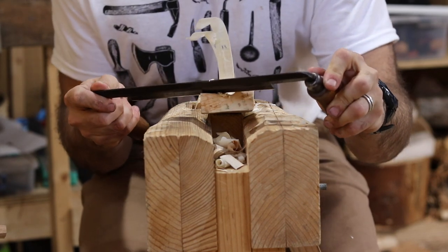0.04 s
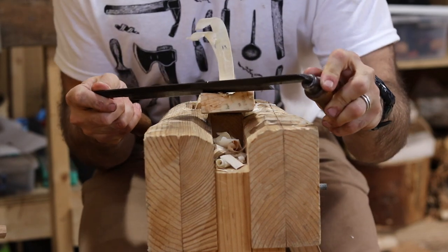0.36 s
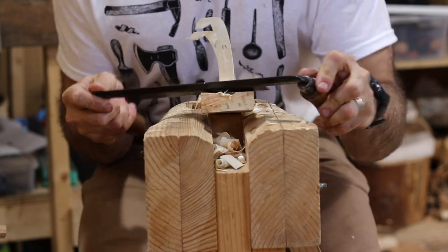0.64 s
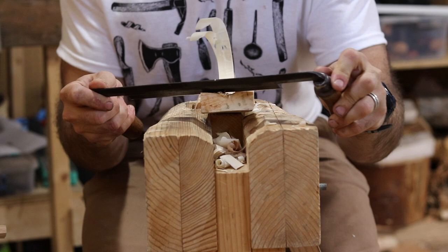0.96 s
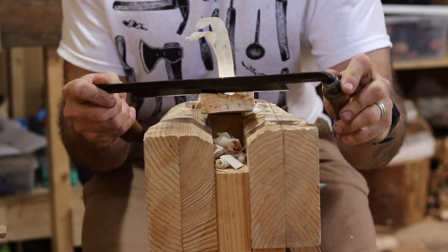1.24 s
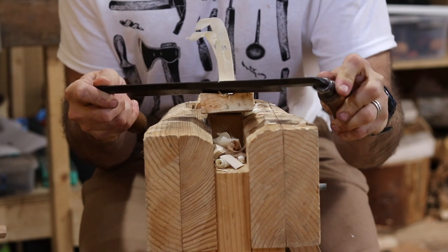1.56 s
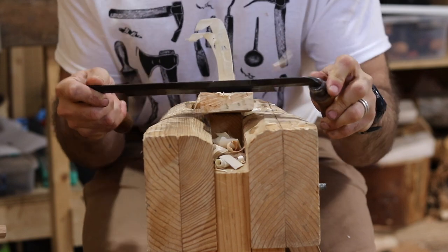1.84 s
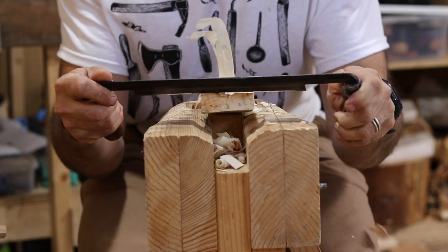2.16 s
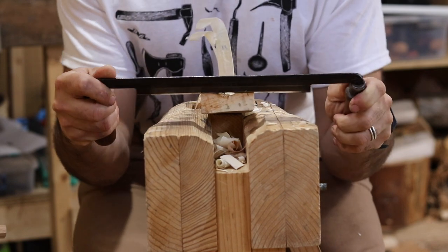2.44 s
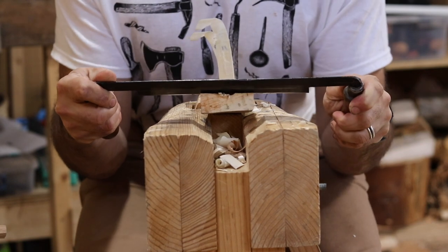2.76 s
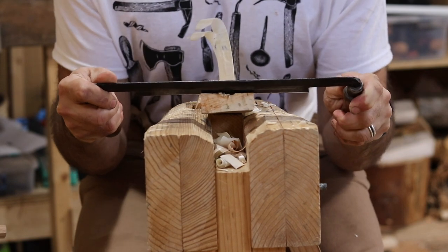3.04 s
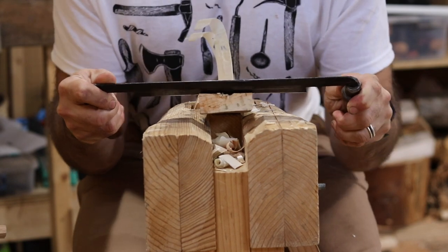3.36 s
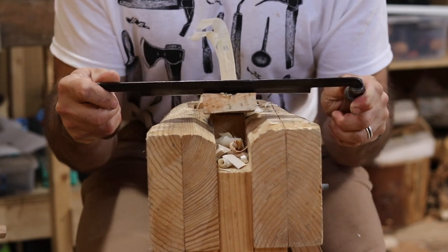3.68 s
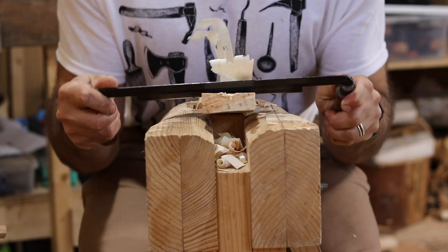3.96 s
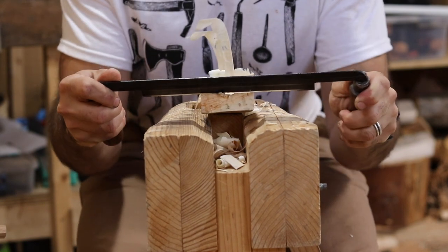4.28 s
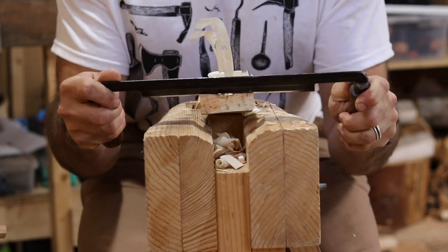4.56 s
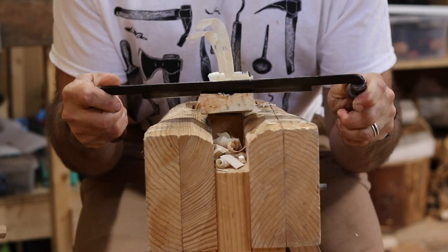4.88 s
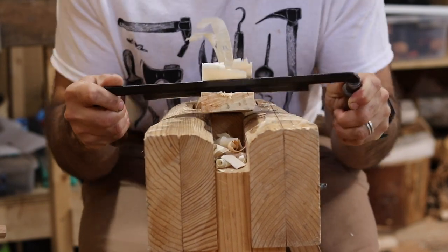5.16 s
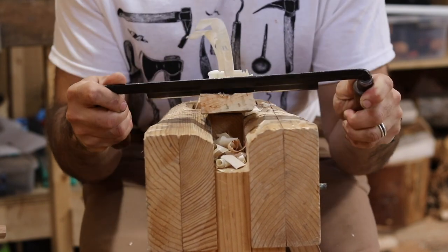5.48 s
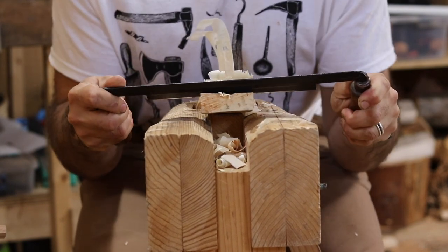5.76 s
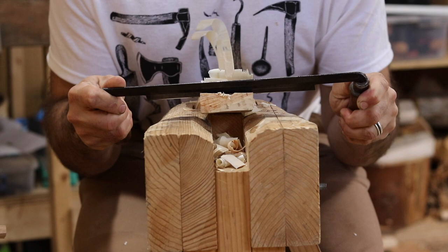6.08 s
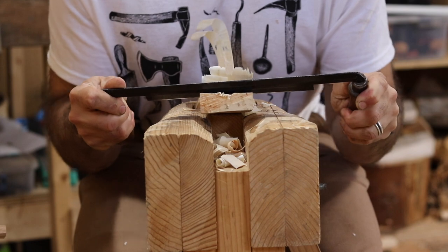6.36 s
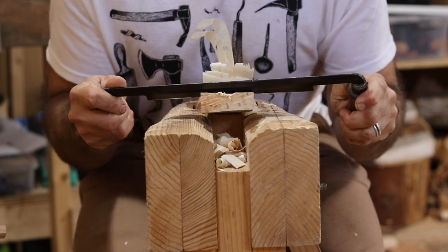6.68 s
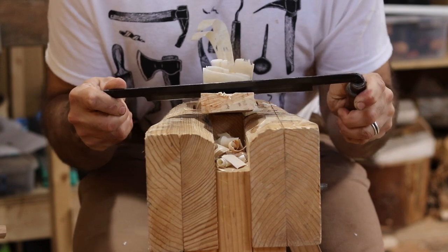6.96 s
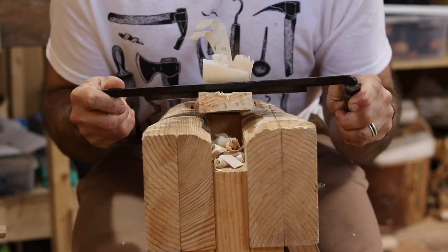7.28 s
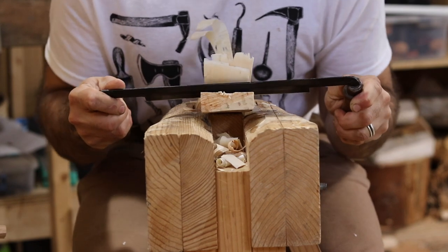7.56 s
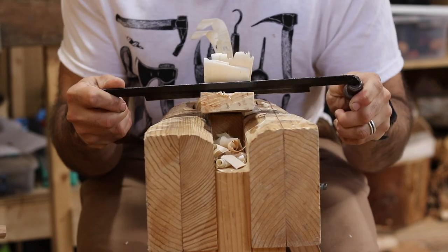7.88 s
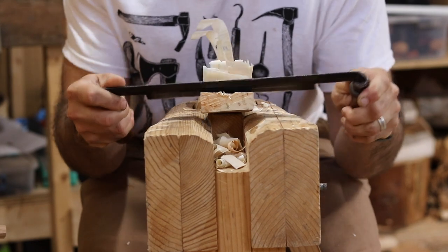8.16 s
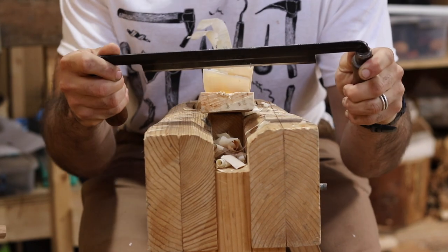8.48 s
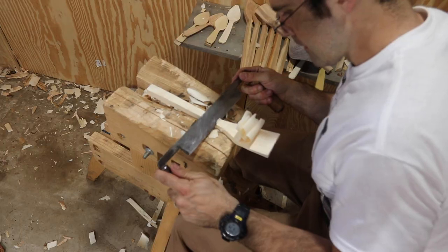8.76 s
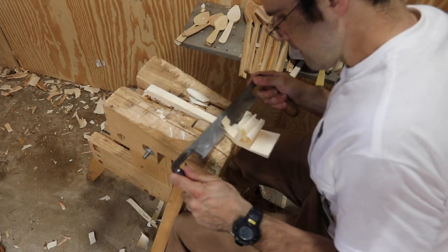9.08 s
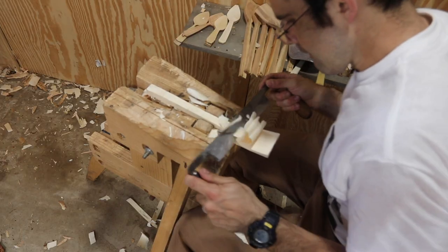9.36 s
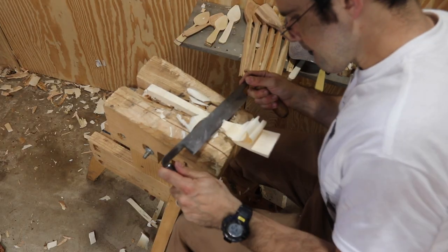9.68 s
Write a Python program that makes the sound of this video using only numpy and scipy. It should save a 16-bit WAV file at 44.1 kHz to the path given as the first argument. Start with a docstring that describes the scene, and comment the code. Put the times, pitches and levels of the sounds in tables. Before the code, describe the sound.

Crackling scrapes of a steel blade shaving wood, broken by sharp snaps, blunt knocks and occasional thuds over a low room rumble.

```python
"""A small, quiet workshop: a drawknife is pulled through a billet clamped in a wooden shaving horse.
The edge tears fibres in a dense crackle and rings the steel blade; the shaving splits ahead of it in
sharp cracks. The billet knocks in its clamp, the horse thuds as the blade breaks through, and a few
faint squeaks pass. Tearing, cracks and knocks ring the wood and the room, over a low, steady rumble."""
import sys
import numpy as np
from scipy import signal
from scipy.fft import rfft, irfft, next_fast_len
from scipy.io import wavfile

SR = 44100
rng = np.random.default_rng(int(sys.argv[2]) if len(sys.argv) > 2 else 0)


def waveform_to_disk(signal):
    """Save audio, clipped to [-1, 1], as 16-bit WAV at the path in sys.argv[1]."""
    frames = np.transpose(np.atleast_2d(signal))
    scaled = np.clip(frames, -1, 1) * 32767
    samples = np.round(scaled).astype(np.int16)
    wavfile.write(sys.argv[1], SR, samples)


N = 429093
TIME = np.arange(N) / SR
BRIGHT_FROM_S = 8.7  # pulls and cracks turn brighter, with less shudder


def undb(db):
    """Decibels to gain."""
    return 10 ** (np.asarray(db) / 20)


def unit(x):
    """Scale to a mean energy of one per channel."""
    return x / np.sqrt(np.mean(np.sum(x ** 2, axis=-1)) + 1e-18)


def along(points, hz):
    """Interpolate (freq_hz, value) points on a log-frequency axis."""
    freq_hz, value = np.transpose(points)
    return np.interp(np.log(hz + 1), np.log(freq_hz), value)


def ring(x, response):
    """Convolve with an impulse response, tail included."""
    return signal.fftconvolve(np.atleast_2d(x), np.atleast_2d(response), axes=-1)


def fade(t, t60_s):
    """Exponential decay, 60 dB in t60_s."""
    return np.exp(-np.log(1000) * t / t60_s)


def wobble(size, rate_hz):
    """Random curve through rate_hz Gaussian points a second."""
    return np.interp(TIME[:size] * rate_hz, np.arange(size), rng.standard_normal(size))


def pan(db):
    """Left, right and room gains; db is left minus right."""
    return undb(np.array([[db], [-db], [0]]) / 2)


def add(out, start_s, sound):
    """Mix a sound in at start_s."""
    i = int(start_s * SR)
    out[:, i:i + sound.shape[1]] += sound[:, :N - i]


def diffuse(size, colour=None, spacing_s=0.00025):
    """Stereo noise from all sides: alike in the bass, unrelated in the treble."""
    padded = next_fast_len(size, True)
    hz = np.fft.rfftfreq(padded, 1 / SR)
    coherence = np.clip(0.98 * np.sinc(2 * hz * spacing_s), -1, 1)
    mid, side = rfft(rng.standard_normal((2, padded))) * np.sqrt([1 + coherence, 1 - coherence])
    gain = 1 if colour is None else undb(along(colour, hz))
    return irfft(gain * np.array([mid + side, mid - side]), padded)[:, :size] / np.sqrt(2)


def path_noise(size, shared=0.48):
    """Left, right and room noise; left and right share a direct part."""
    direct, room = rng.standard_normal((2, size))
    return np.vstack([np.sqrt(1 - shared) * diffuse(size) + np.sqrt(shared) * direct, room])


# Still air: freq_hz, level_db
AIR_SPECTRUM = [(15, -34), (25, -20.5), (59, -8.5), (111, -15.5), (145, -11), (170, -19.5), (212, -25),
                (270, -21), (734, -25.5), (4490, -36.5), (5570, -43), (6050, -34), (9840, -38.5),
                (16000, -47.5)]


def air(level_db=-47.5):
    """Steady low rumble and faint hiss of the room."""
    return unit(diffuse(N, AIR_SPECTRUM)) * np.sqrt(N) * undb(level_db) * pan(-1.6)[:2]


# Reverberation: freq_hz, level_db, t60_s
ROOM_BANDS = [(100, 5, 0.99), (410, 5, 0.33), (1070, 8.5, 0.29), (3170, 1, 0.45), (7400, 6.5, 0.26),
              (14000, -4.5, 0.54)]


def workshop(paths, gain_db=-3.5, build_s=0.0011, size=32768):
    """Direct sound plus reflections from floor, shelves and walls; the bass lasts longest."""
    t, tail = TIME[:size], 0
    centres_hz, levels_db, t60s_s = np.transpose(ROOM_BANDS)
    noise, bins_hz = rfft(diffuse(size)), np.fft.rfftfreq(size, 1 / SR)
    for weights, db, t60_s in zip(np.eye(len(centres_hz)), levels_db, t60s_s):
        band = irfft(noise * along(np.transpose([centres_hz, weights]), bins_hz))
        envelope = unit(fade(t, t60_s) * (1 - np.exp(-t / build_s)))
        tail = tail + undb(db + gain_db) * band * envelope
    return paths[:2] + pan(-1.6)[:2] * ring(paths[2], tail)[:, :N]


# Squeaks: start_s, length_s, pitch_hz, level_db
SQUEAKS = [(0.323, 0.12, 3180, -48), (1.534, 0.081, 5520, -55), (5.644, 0.084, 3330, -42.5),
           (8.265, 0.13, 10900, -54), (8.57, 0.22, 5140, -63)]


def squeaks(sag_per_s=1.0, waver=0.022, waver_hz=600, flutter_db=4, size=8192):
    """Thin, rough squeaks that flutter and sag in pitch."""
    out, t = np.zeros((3, N)), TIME[:size]
    for start_s, length_s, pitch_hz, level_db in SQUEAKS:
        bend = 1 - sag_per_s * (t - length_s / 2) + waver * wobble(size, waver_hz)
        phase = 2 * np.pi * np.cumsum(pitch_hz * bend) / SR
        gain = undb(level_db + flutter_db * wobble(size, waver_hz))
        swell = np.interp(t, [0, 0.005, length_s / 2, length_s], [0.55, 0.74, 0.52, 0.085])
        add(out, start_s, gain * swell * np.sin(phase) * pan(-2))
    return out


# Frame thuds: start_s, level_db, t60_s
LURCHES = [(0.743, -36, 0.36), (1.79, -43, 0.34), (3.942, -36, 0.37), (5.017, -20.5, 0.25),
           (5.065, -22, 0.26), (5.76, -33.5, 0.36), (9.255, -28, 0.22)]


def lurches(rise_s=0.0022, size=12288):
    """The blade breaks through; the heavy frame rocks and thuds on the floor."""
    out, t = np.zeros((3, N)), TIME[:size]
    for start_s, level_db, t60_s in LURCHES:
        thud = diffuse(size, [(20, -28), (45, -3), (70, -9), (100, -1), (200, -4), (270, -11),
                              (400, -1.5), (600, -28), (2000, -60)])
        envelope = fade(t, t60_s) * (1 - np.exp(-t / rise_s))
        add(out[:2], start_s, undb(level_db) * thud / thud.std() * envelope)
    return out


# Cut wood, two colours: freq_hz, level_db
DARK_WOOD = [(88, -51), (150, -5.5), (254, -15.5), (391, 4), (457, -1.5), (624, 2), (759, -6.5),
             (923, -5.5), (1290, -8), (1530, -9.5), (2270, -13), (3840, -15.5), (4860, -20.5), (9260, -18),
             (16000, -32)]
BRIGHT_WOOD = [(59, -35), (100, -21), (210, -7), (492, -7.5), (662, 0), (736, -9), (872, 7.5), (1520, -5),
               (3860, -7.5), (4870, -11.5), (8460, -6), (11900, -12), (16000, -20.5)]
# Resonances of billet and horse: freq_hz, level_db
HORSE_MODES = [(376.8, -41), (802.1, -36), (936.7, -57), (1572, -92), (1997, -42), (2439, -34.5)]
# Bounds of the body, rasp, bite and hiss bands: edge_hz
BAND_EDGES_HZ = [60, 800, 2000, 4500, 18000]


def wood(colour, ring_db, quality=28, size=4096):
    """Wood's response, a short snap plus the ringing horse, in four bands of unit energy."""
    t = TIME[:size]
    cepstrum = irfft(np.log(undb(along(colour, np.fft.rfftfreq(size, 1 / SR)))))
    cepstrum[1:size // 2] *= 2  # fold to minimum phase
    cepstrum[size // 2:] = 0
    snap = irfft(np.exp(rfft(cepstrum)))
    modes = sum(undb(db) * np.sqrt(hz) * np.exp(-np.pi * hz / quality * t) * np.cos(2 * np.pi * hz * t)
                for hz, db in HORSE_MODES)
    response = unit(snap) + undb(ring_db) * unit(modes)
    filters = [signal.butter(3, band_hz, "band", fs=SR, output="sos")
               for band_hz in zip(BAND_EDGES_HZ, BAND_EDGES_HZ[1:])]
    return np.array([unit(signal.sosfilt(sos, response)) for sos in filters])


# Blade and billet against the horse: start_s, level_db, hardness_db, pitch_hz, note_db
KNOCKS = [(0.127, -19.5, -7, 518, 5.5), (0.171, -27, -9, 490, -9), (0.483, -23, -1.5, 864, -29),
          (0.639, -19, 1.5, 351, -2.5), (0.963, -34, 9, 644, 6), (1.117, -36, 1, 665, 12),
          (1.227, -35, 13.5, 535, 4.5), (1.256, -28.5, -10, 927, 0), (1.569, -18, -0.5, 537, -1),
          (1.972, -30.5, 11, 538, 1), (2.097, -29.5, 9, 697, 1.5), (2.144, -28, -4.5, 690, -4),
          (3.538, -34.5, -1.5, 508, -0.5), (4.166, -38.5, 8.5, 930, -11), (6.237, -30, 4, 686, -18),
          (8.167, -34, 0, 492, 6), (8.202, -41, -19, 426, 17.5)]


def knocks(gain_db=16, rattle_t60_s=0.13, note_t60_s=0.06, size=4096):
    """Blunt contacts rattle in the clamp, brighter when harder; each sends one note into the room."""
    out, t, bands = np.zeros((3, N)), TIME[:size], wood(DARK_WOOD, ring_db=-12.5)
    for start_s, level_db, hardness_db, pitch_hz, note_db in KNOCKS:
        gain = undb(level_db + gain_db)
        rattle = unit(diffuse(size) * fade(t, rattle_t60_s))
        contact = np.vstack([rattle, undb(-2) * (t == 0)])
        response = undb([0, hardness_db / 2 + 2, hardness_db - 3, hardness_db / 2 - 12]) @ bands
        add(out, start_s, gain * ring(contact, response) * pan(-0.7))
        note = unit(np.sin(2 * np.pi * pitch_hz * t) * fade(t, note_t60_s))
        add(out, start_s, gain * undb(note_db + 2) * note * undb([[0], [0], [-5]]))
    return out


def fibres(size, per_s, spread_db, snap_s):
    """Envelope of fibres snapping at random: many small, a few large."""
    hits = rng.random(size) < per_s / SR
    snaps = hits * undb(spread_db * np.minimum(rng.exponential(size=size), 4))
    power = signal.lfilter([1], [1, -np.exp(-1 / (snap_s * SR))], snaps ** 2) + 1e-12
    return np.sqrt(power / power.mean())


def chip(hz, quality, size=4096):
    """One damped bending note of a sliver of wood."""
    t = TIME[:size]
    return unit(np.exp(-np.pi * hz / quality * t) * np.sin(2 * np.pi * hz * t))


# Splits of the shaving: snap_s, level_db, body_db, hiss_db, pan_db, pitch_hz
CRACKS = [(0.389, -19.5, -5, -8, -1, 3500), (0.5861, -18.5, -6, -3, -6.5, 3500),
          (0.7236, -20, 2.5, 2, -4, 3750), (1.1129, -21.5, -1, -11.5, -4, 1060),
          (1.2048, -24.5, -26, 8.5, -2, 3000), (1.5337, -14, -13, -8.5, -1, 5620),
          (1.7505, -34, 10, 15.5, -3, 1450), (1.7755, -25.5, 4, -7, 2, 8250),
          (1.853, -23, -4, -3, -7, 7800), (2.395, -35, -14, -5, -7, 3070),
          (2.7267, -21, -8, -14, -10, 2580), (2.7904, -12.5, -44, -8, -3, 1370),
          (2.8868, -25, 1, 2, -2, 2890), (2.9368, -19.5, -0.5, -3.5, -6, 1740),
          (3.0028, -35, 2, 8.5, -3.5, 1520), (3.0224, -26, -2, 1, -4, 6240),
          (3.1143, -20.5, 5, 2, -2, 2790), (3.3096, -12, -15, -3, -2, 1900),
          (3.5991, -13.5, -7.5, -9, 0, 1700), (3.775, -27.5, 1, -1.5, 0, 2450),
          (3.9764, -21, -28, -8, -5, 1410), (4.4652, -25, 1, 4, 0, 7000),
          (4.7301, -15.5, -3.5, -7.5, -3, 1800), (4.832, -29, 5, -5, -8, 1560),
          (5.0383, -7.5, -19, -8, -3, 2040), (5.0669, -19.5, 10, 2.5, -9, 1960),
          (5.1684, -34, -16, 13.5, -4, 1165), (5.1947, -24.5, -10.5, 0.5, -4, 1100),
          (5.3472, -29.5, 3, -2.5, -2, 1070), (5.4607, -27, 1, 1.5, -1, 1100),
          (5.5912, -26.5, 6, -7, -2, 2800), (5.7324, -24, -11, 2, -1, 2880),
          (5.8486, -32, -30, 12.5, -5, 8400), (5.935, -16.5, -13, 0.5, -4, 5900),
          (5.9751, -17, -12, -1, -6, 1104), (6.129, -33.5, 1.5, -2, -3, 3030),
          (6.2168, -28.5, 9, 0, -4, 1030), (6.2881, -33.5, 0, -5, -3.5, 3170),
          (6.5062, -10, -13.5, 1, -10.5, 3650), (6.6921, -27, 1.5, -8, -2.5, 1060),
          (6.766, -19, -3, -8, -10, 1490), (6.773, -13.5, -6, -4, -3, 3820),
          (6.8323, -13.5, -6.5, 0.5, -4, 3270), (6.9628, -22.5, 7.5, -3.5, 12, 1700),
          (7.1576, -29.5, 4, 5, -10, 3380), (7.3265, -37.5, 12.5, 10.5, -3, 6800),
          (7.514, -13, -2.5, -2, -5, 2930), (7.565, -13, -14, -16, 4, 1270), (7.572, -12, -16, 2, -9, 1700),
          (7.6932, -28.5, 4, -8, -8, 1980), (7.7817, -27, 3, -8.5, -8, 1140),
          (8.1504, -21, -10.5, 1, -6, 2830), (8.85, -18.5, 3, -4.5, -7, 1050),
          (8.936, -25, -4.5, -9, 1, 1120), (8.9815, -19.5, 2, -6, -4, 1150),
          (9.0805, -17.5, -0.5, -4.5, -3, 1140), (9.134, -19.5, -13, -20, 4, 1060),
          (9.1571, -13, -9, -5, -4, 1340), (9.2605, -11.5, -7, -6, -10, 1970),
          (9.373, -23.5, -33, -3, -2, 1250), (9.5048, -20, -7, -8, -5, 1330),
          (9.514, -16, -18, -2, -5, 1370)]


def cracks(gain_db=18, room_db=-2, scatter_db=-5, scatter_t60_s=0.048, size=2048):
    """Fibres give, the split opens with one snap and runs on; the jaws scatter it briefly."""
    out = np.zeros((3, N))
    dark, bright = wood(DARK_WOOD, ring_db=-22), wood(BRIGHT_WOOD, ring_db=-35)
    t = TIME[:size] - TIME[size // 4]
    snap = 1.0 * (t == 0)
    for snap_s, level_db, body_db, hiss_db, pan_db, pitch_hz in CRACKS:
        # ragged under the moving blade, clean from rest
        cutting = any(s <= snap_s <= s + build_s + ease_s for s, build_s, ease_s, *_ in PULLS)
        lead_s, run_s, snap_db = (0.0011, 0.0056, -7) if cutting else (0.00035, 0.007, -1.6)
        envelope = np.exp(np.minimum(t / lead_s, -t / run_s))
        crackle = fibres(size, per_s=3000, spread_db=2.5, snap_s=0.0003)
        tear = unit(diffuse(size) * envelope * crackle)
        scatter = unit(diffuse(size) * (t > 0) * fade(abs(t), scatter_t60_s))
        direct = unit(undb(snap_db) * snap + tear + undb(scatter_db) * scatter)
        split = np.vstack([direct, undb(room_db) * snap]) * undb(level_db + gain_db)
        body, rasp, bite, hiss = dark if snap_s < BRIGHT_FROM_S else bright
        chip_db = -4 + 2 * np.log2(pitch_hz / 2550)
        upper = undb(0.52 * body_db) * rasp + bite + undb(hiss_db) * hiss  # thicker chips rasp more
        upper += undb(chip_db) * chip(pitch_hz, quality=18)
        add(out, snap_s + t[0], ring(split, undb(body_db) * body) + pan(pan_db) * ring(split, upper))
    return out


# Blade resonances: freq_hz, width_hz, level_db
BLADE_MODES = [(1460, 102, -3), (2080, 57, -20), (2750, 510, 12), (4200, 110, -9), (6390, 530, 7)]


def blade(size=1024):
    """Response of the steel, damped by the hands and the wood."""
    t = TIME[:size]
    return unit(sum(undb(db) * width_hz * np.exp(-np.pi * width_hz * t) * np.cos(2 * np.pi * hz * t)
                    for hz, width_hz, db in BLADE_MODES))


def stroke(t, build_s, ease_s, build_db=11, ease_db=13, leave_s=0.004):
    """Effort of one pull: the edge sinks in, is loaded to a peak, eases and leaves the wood."""
    end_s = build_s + ease_s
    contact = np.interp(t, [0, 0.36 * build_s, end_s, end_s + leave_s], [0, 1, 1, 0])
    return contact * undb(np.interp(t, [0, build_s, end_s], [-build_db, 0, -ease_db]))


def splinters(size, per_s=70, spread_db=4):
    """Lone coarse fibres tick above the fine tearing."""
    hits = rng.random(size) < per_s / SR
    return hits * undb(spread_db * np.minimum(rng.exponential(size=size), 3))


def tearing(size, slip_hz=170, slip_db=3, splinter_db=14):
    """The edge sticks and slips across the grain, snapping fibres."""
    slips = undb(slip_db * wobble(size, slip_hz))
    crackle = path_noise(size) * slips * fibres(size, per_s=800, spread_db=3, snap_s=0.0009)
    return crackle + undb(splinter_db) * splinters(size)


def shudder(size):
    """Low rumble of the whole horse shaking under a pull."""
    rumble = diffuse(size, [(20, -22), (45, 0), (70, -15), (100, 9), (200, 4.5), (270, -7),
                            (400, -13), (2000, -77)])
    return rumble / rumble.std()


# Bites of the blade: start_s, build_s, ease_s, level_db, body_db, hiss_db, pitch_hz
PULLS = [ (0.65, 0.07, 0.1, -35, 3, 3, 3500), (1.25, 0.02, 0.51, -46.5, 3, -7, 2400),
         (1.6, 0.15, 0.12, -41, 3, -0.5, 1470), (1.73, 0.048, 0.13, -33.5, 5, 2, 1420),
         (2.479, 0.1, 0.27, -45, -3, -5, 1480), (2.68, 0.13, 0.022, -39.5, 12, -7, 2280),
         (2.93, 0.0064, 0.2, -36, -4, -9, 1720), (3.09, 0.041, 0.014, -30.5, 2, -5, 1210),
         (3.297, 0.02, 0.12, -31.5, -0.5, -3.5, 1890), (3.73, .11, 0.16, -39, 8, -1, 850),
         (3.875, 0.063, 0.042, -28, 2.5, -1, 1600), (4.03, 0.047, 0.038, -43.5, -4, -3, 2700),
         (4.195, 0.031, 0.15, -56.5, 14.5, -20, 1340), (4.294, 0.022, 0.041, -46.5, 14, -26, 1310),
         (4.452, 0.031, 0.019, -30, -3, -9, 1120), (4.61, 0.042, 0.13, -40, 5, -4, 1830),
         (4.76, .035, .08, -37, -6, -13, 2440), (4.9, .13, 0.06, -26, 7, 0, 1640),
         (5.12, 0.048, 0.12, -36.5, 0.5, -5.5, 1150), (5.29, 0.046, 0.073, -43.5, 13.5, -22, 1036),
         (5.44, 0.051, 0.12, -37.5, 5.5, -4, 1080), (5.579, 0.068, 0.014, -34, 5.5, -4, 647),
         (5.72, 0.043, 0.031, -30, 2.5, -1, 1760), (5.905, 0.028, 0.04, -31.5, -0.5, -1, 1090),
         (5.999, 0.011, 0.016, -33, 6, -3, 730), (6.35, 0.024, 0.032, -35, 3.5, -9, 2230),
         (6.455, 0.052, 0.019, -32, 2.5, -1.5, 1620), (6.519, 0.043, 0.055, -36, 0.5, 2, 1220),
         (6.753, 0.021, 0.022, -27.5, 0, 0, 1440), (6.836, 0.055, 0.13, -40.5, 7, 1, 1100),
         (6.951, 0.011, 0.29, -42.5, 4, -6, 690), (7.07, 0.084, 0.12, -37.5, 8, 5, 3600),
         (7.21, .11, 0.22, -38.5, 4, -6, 1080), (7.39, 0.14, .04, -53.5, 22.5, -15, 984),
         (7.529, 0.072, 0.081, -32, -2.5, -2, 2370), (7.775, 0.024, 0.12, -43.5, 2, -6, 890),
         (8.795, 0.0092, 0.057, -38, 6.5, -7, 1180), (8.85, 0.15, .1, -43, 6, -7, 1160),
         (9.05, .11, 0.048, -31, 7.5, -2, 1110), (9.19, 0.072, 0.031, -26, 8.5, 4.5, 1910),
         (9.32, 0.074, 0.11, -48.5, 16, -2, 1230), (9.497, 0.013, 0.093, -24.5, -0.5, -3, 1410),
         (9.64, 0.072, 0.061, -48.5, 10.5, 0, 1270)]


def pulls(gain_db=-5.5, hard_pull_db=-30, size=16384):
    """Tearing rings wood, curling shaving and blade; load brings out the blade and shakes the horse."""
    out, t = np.zeros((3, N)), TIME[:size]
    dark, bright = wood(DARK_WOOD, ring_db=-20), wood(BRIGHT_WOOD, ring_db=-15)
    for start_s, build_s, ease_s, level_db, body_db, hiss_db, pitch_hz in PULLS:
        effort = undb(level_db + gain_db) * stroke(t, build_s, ease_s)
        load = effort / undb(hard_pull_db)
        tear = tearing(size) * effort
        bands, shudder_db = (dark, -11) if start_s < BRIGHT_FROM_S else (bright, -21)
        rasp_db = 0.64 * body_db
        gains = undb(body_db - 2), undb(rasp_db - 2) * pan(-2.8), pan(-4.5), undb(hiss_db) * pan(-6)
        response = sum(gain * band for gain, band in zip(gains, bands))
        add(out, start_s, ring(tear, response))
        add(out, start_s, undb(rasp_db - 3) * pan(-0.98) * ring(tear, chip(pitch_hz, quality=7.2)))
        add(out, start_s, pan(-4.4) * ring(tear * load ** 0.43, blade()))
        shake = effort * undb(body_db + shudder_db) * load ** 0.087
        add(out[:2], start_s, shake * shudder(size))
    return out


def scene():
    """Drawknife work in the workshop."""
    return workshop(pulls() + cracks() + knocks() + lurches() + squeaks()) + air()


def record(dry, top_hz=16200):
    """Round the highest peaks, then low-pass."""
    return signal.sosfilt(signal.ellip(8, 0.2, 70, top_hz, fs=SR, output="sos"), np.tanh(dry))


dry = scene()
out = record(dry)
waveform_to_disk(out)
```